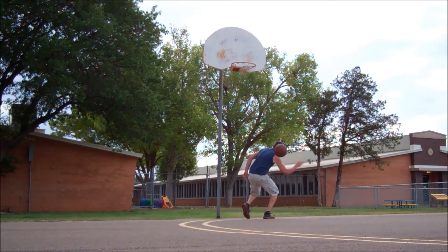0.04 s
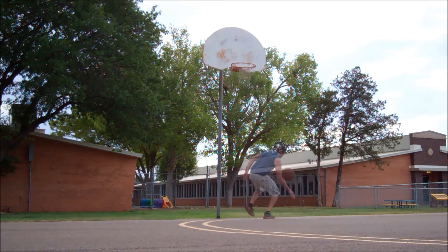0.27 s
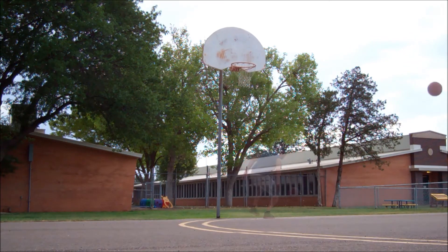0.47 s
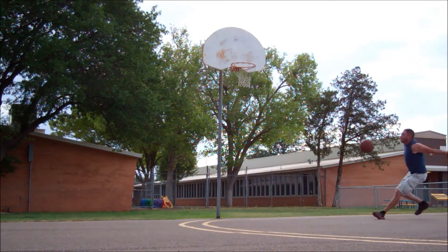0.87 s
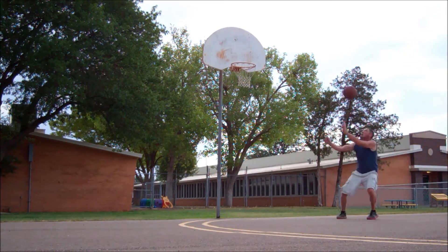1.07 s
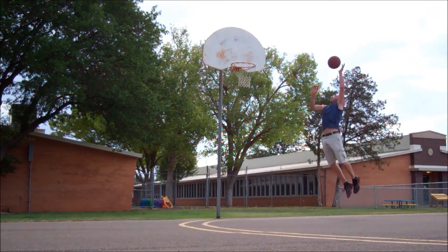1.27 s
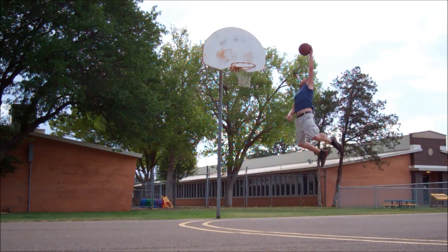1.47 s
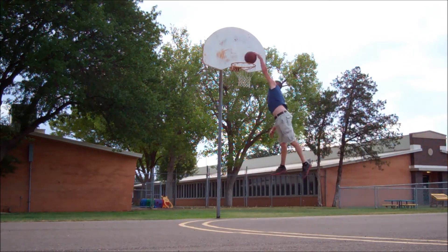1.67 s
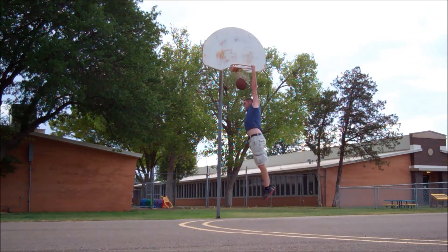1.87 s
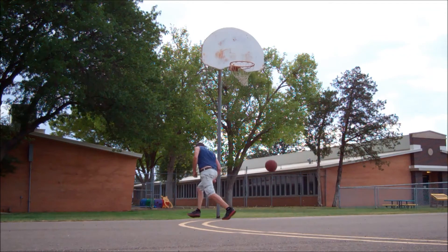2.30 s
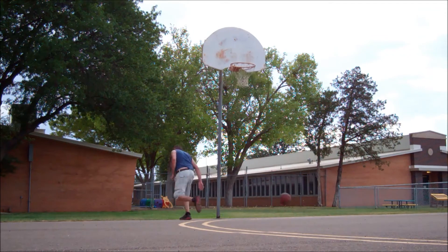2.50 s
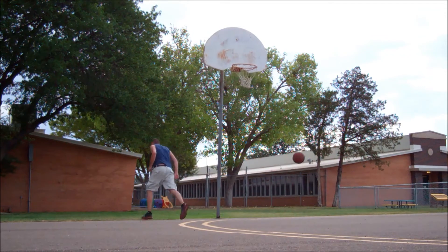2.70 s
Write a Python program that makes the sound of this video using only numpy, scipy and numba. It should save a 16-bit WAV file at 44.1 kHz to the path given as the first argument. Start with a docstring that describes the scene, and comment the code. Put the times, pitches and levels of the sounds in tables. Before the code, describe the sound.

A basketball bounces sharply twice on an outdoor court, with a thin echo. Between the bounces come gritty steps, a scuffing jump, a rattling dunk and a landing. Soft wind and a low hum fill the microphone throughout.

```python
"""Over a soft wind, a shoe scuffs and a basketball slaps the asphalt of an outdoor court, the air inside it
ringing. A player runs up over loose grit, scuffs into his jump and dunks: the steel rim rattles and hums,
and the backboard shudders. He lands and the ball bounces again. A low hum and a faint bird lie behind, and
walls and trees return a thin echo. The camera's gain control ducks at each bounce and slowly lets the
wind back in."""
import sys
import numpy as np
from scipy import signal
from scipy.fft import rfft, irfft, next_fast_len
from scipy.io import wavfile
from scipy.ndimage import uniform_filter1d, minimum_filter1d
from numba import njit

SR = 44100
rng = np.random.default_rng(int(sys.argv[2]) if len(sys.argv) > 2 else 0)


def generate_wav(sig):
    """Save sig (samples, or channels by samples) to the path in sys.argv[1] as 16-bit PCM at SR."""
    pcm = np.round(np.clip(np.atleast_2d(sig).T, -1, 1) * 32767).astype(np.int16)
    wavfile.write(sys.argv[1], SR, pcm)


N = 125685

# Wind common to both microphones, and the part that differs. Each row: frequency in Hz, gain in dB.
WIND_SPECTRUM = [(15, -61), (25, -16), (48, -9), (70, -4), (87, -4), (107, 0), (152, -5), (200, -4.5),
                 (322, -11.5), (457, -10), (493, -12.5), (813, -10), (1150, -13), (1280, -15),
                 (2640, -27.5), (3480, -28.5), (5890, -36.5), (7500, -40.5), (7880, -36.5), (8300, -39.5),
                 (9960, -44), (12900, -60), (21900, -120)]
WIND_SIDE_SPECTRUM = [(25, -12), (100, -9), (300, -7), (1000, 1.5), (3000, -5.5), (8000, -15.5),
                      (10000, -26), (14000, -44)]
# Strength of the wind. Each row: time in seconds, gain in dB.
GUSTS = [(.2, -0.5), (.45, 1.5), (.8, -1), (1.1, 2.5), (1.498, 0.5), (1.8, 0.5), (2.1, -.5), (2.5, -1.5),
         (2.85, 1)]
# A low hum and the camera's thin whine. Each row: frequency in Hz, rms level in dB.
HUM_TONES = [(102.3, -50), (132, -53.5), (7854, -74.5), (7881, -81)]
# Stereo balance of the wind and of the court. Each row: frequency in Hz, left minus right in dB.
WIND_BALANCE = [(30, 0), (120, 4), (1200, 4), (4000, 7.5), (8000, 8.5), (13000, -2.5)]
COURT_BALANCE = [(40, 0.5), (150, 4), (1200, 3.5), (2500, 4.5), (4500, 7), (8000, 16), (10500, 11.5),
                 (13000, -1)]
# Contour of the bird's whistle. Each row: time in seconds, pitch in Hz, level in dB.
WHISTLE = [(1.735, 3600, -60), (1.757, 4800, -61), (1.775, 3950, -54), (1.795, 3350, -57),
           (1.821, 2850, -55)]
# Single grains snapping. Each row: start in seconds, level in dB, tilt in dB per octave.
SNAPS = [(0.5154, -19, -2.5), (0.6752, -24.5, -3), (.8825, -21, 6), (0.9472, -20, 2), (1.3755, -22.5, -2),
         (1.9995, -30, -1), (2.2205, -26, -3), (2.4606, -28, -2)]
# Grit sprayed by a twisting sole. Each row: peak time in seconds, half length in seconds, level in dB.
SPRAYS = [(0.388, 0.0098, -49.5), (1.243, 0.016, -49), (2.48, 0.0099, -46)]
# Spectra of grit snapping, spraying and grinding, and of a sole's smack.
# Each row: frequency in Hz, gain in dB.
SNAP_SPECTRUM = [(300, -25), (1500, -2), (3500, 4.5), (7500, -7), (10000, -13.5), (14000, -28),
                 (21900, -80)]
SPRAY_SPECTRUM = [(500, -27), (2500, 6), (6000, -1), (9000, -2.5), (10500, -9.5), (12500, -15),
                  (14000, -32), (21900, -90)]
SCUFF_SPECTRUM = [(120, -47), (200, -22), (460, -0.5), (740, -2), (1030, -8.5), (1310, -1), (1820, -3.5),
                  (2440, 0.5), (3330, -2.5), (4260, -2), (6300, -12), (8740, -15), (9960, -25),
                  (12900, -54), (21900, -120)]
SOLE_SPECTRUM = [(47, -46), (80, -11), (229, -0.5), (380, -3.5), (520, -1.5), (700, -1.5), (900, -2),
                 (1220, 1), (1430, -4), (1830, -3), (2060, -8.5), (2600, -9), (4100, -12.5), (4350, -11.5),
                 (9960, -41), (12900, -58), (21900, -120)]
# Footfalls of running and landing.
# Each row: start in seconds, level in dB, 60 dB decay time (t60) in seconds, tilt in dB per octave.
STEPS = [(0.4581, -31, 0.019, 0.3), (0.9467, -28, 0.043, -4.5), (.980, -39, 0.019, 1),
         (1.3037, -37.5, .03, 6.5), (1.978, -36, 0.014, -0.5), (2.186, -32.5, 0.0055, 0),
         (2.427, -34.5, 0.025, -4), (2.6956, -32.5, 0.043, -4.5), (2.80, -37, 0.018, 3.5)]
LANDING = [(2.1493, -22, .018, 2), (2.153, -17, .02, -2), (2.156, -28, 0.07, -1),
           (2.162, -32.5, 0.043, 1.5), (2.1703, -25.5, 0.025, 0.5)]
# Sliding soles. Each row: peak time, rise and fall in seconds, level in dB, tilt in dB per octave.
SCUFFS = [(.485, 0.036, .025, -53, -1.5), (.575, 0.01, 0.013, -48, -2.5), (.628, 0.005, .006, -50.5, 3),
          (.925, 0.027, 0.024, -50, 4), (1.003, 0.0046, 0.0083, -32, 1), (1.018, 0.015, 0.019, -30, -1),
          (1.04, 0.0082, 0.011, -35.5, 1), (1.119, 0.012, .0115, -23, 1), (1.235, 0.051, 0.025, -42.5, 1.5),
          (1.34, 0.097, 0.079, -49, -1), (1.953, 0.0077, 0.017, -43, -3.5), (2.205, 0.018, 0.042, -44, -5),
          (2.445, 0.034, 0.026, -45.5, -3), (2.479, .005, 0.014, -43.5, -0.5),
          (2.508, 0.0088, 0.014, -49.5, 0.5), (2.667, 0.0098, 0.013, -48, 2.5)]
# Blows on the rim. Each row: start in seconds, rattle level in dB, rattle t60 in seconds,
# rattle tilt in dB per octave, ring level in dB.
RIM_BLOWS = [(1.8289, -25.5, 0.062, .7, -43), (1.8349, -29, 0.12, 0.4, -39), (1.841, -29.5, 0.1, .8, -45),
             (1.854, -25.5, 0.046, -0.5, -33), (1.8601, -17, 0.022, .3, -32.5),
             (1.868, -28.5, 0.048, .5, -45), (1.8816, -28.5, 0.038, 2, -43.5)]
# The rim rocking on its mount. Each row: start in seconds, frequency in Hz, level in dB, t60 in seconds.
RIM_KNOCKS = [(1.831, 245, -24, .07), (1.8333, 126, -18, 0.063), (1.856, 310, -28, .05),
              (1.878, 302, -25, 0.037), (1.888, 450, -26.5, .05), (1.916, 474, -31, .07)]
# Modes of rim and backboard, and of the clink as the hoop is let go.
# Each row: frequency in Hz, level in dB, t60 in seconds.
RIM_MODES = [(117.4, -9, 0.08), (136.7, -8, 0.76), (202, -10, .15), (231.6, -4, 0.33), (274.5, -10.5, 0.38),
             (332.8, -6, 0.5), (397, -6, 0.25), (446, -8, .32), (505.2, -14, 0.35), (702, -11, 0.24),
             (954, -3.5, 0.088), (1106, -10, 0.11), (2253, -8, 0.12), (2850, -12, 0.12)]
CLINK_MODES = [(2050, -12, 0.18), (2220, -5, 0.18), (2510, -6.5, 0.2), (2720, -9, 0.13), (3260, -4.5, .14),
               (3420, -9, .1), (3600, -2, 0.07), (4620, -9, 0.12)]
# Spectra of the rattling rim and shuddering backboard and pole. Each row: frequency in Hz, gain in dB.
RATTLE_SPECTRUM = [(47, -34), (80, 4), (127, -1), (179, -5.5), (335, 1), (799, -12.5), (958, 0.5),
                   (1410, -20), (2100, -14), (2850, -10.5), (4350, -24), (4910, -18), (5890, -17.5),
                   (7070, -30.5), (8650, -21.5), (9960, -38), (12900, -43), (21900, -120)]
SHUDDER_SPECTRUM = [(25, -47), (70, -19), (110, -10), (170, -5), (250, -1), (400, -0.5), (520, -7),
                    (700, -20), (2000, -47), (12000, -90)]
# Bounces of the ball. Each row: start in seconds, slap level in dB, slap width in ms, delay and width of
# its return in ms, return relative to the slap in dB, then levels in dB of the thump, the ring while
# squashed, the ring at lift-off and the grit.
BOUNCES = [(0.8209, 10, 0.038, 0.73, .043, -0.5, -6, -12, -3.5, -11),
           (2.5779, 7.5, 0.047, 0.632, .085, -5, -9.5, -16, -15, -17)]
# Tone of the ball's slap. Each row: frequency in Hz, gain in dB.
SLAP_SPECTRUM = [(500, -2.5), (800, 2), (1150, 4), (2000, -1.5), (2700, 3), (3400, 0), (4100, -5),
                 (5400, -0.5), (7200, -4), (8700, 1), (11000, 3), (15000, -3)]
# Modes of the squashed shell and the air inside. Each row: frequency in Hz, level in dB, t60 in seconds.
SHELL_MODES = [(100, 0, .05), (255, -10, .03), (620, -9, .018)]
CAVITY_MODES = [(640, -15, 0.031), (847, -6.5, 0.029), (962, 0, 0.03), (990, -23, 0.12),
                (1210, -6.5, 0.029), (1360, -20, 0.041), (1666, -13, 0.051), (2100, -23, 0.055),
                (2227, -33, 0.16), (2770, -33, 0.14), (3270, -39, 0.16)]


def undb(db):
    """Amplitude ratio of a level in decibels."""
    return 10 ** (np.asarray(db) / 20)


def clock(length=N):
    """Sample times in seconds."""
    return np.arange(length) / SR


def unit(x):
    """Normalisation to an rms of 1."""
    return x / np.sqrt(np.mean(x ** 2))


def at(x, start):
    """A delay that places a sound on the time line, at start seconds."""
    return np.pad(x, (int(round(start * SR)), N))[:N]


def colour(x, points, tilt_db=0):
    """Minimum-phase filter through (Hz, dB) points, tilted by tilt_db per octave."""
    size = next_fast_len(len(x) // 2 + 2048) * 2
    octave = np.log2(np.maximum(np.fft.rfftfreq(size, 1 / SR), 1))
    hz, db = np.array(points, float).T
    gain_db = np.interp(octave, np.log2(hz), db + tilt_db * np.log2(hz / hz[0]))
    cepstrum = irfft(np.log(undb(gain_db)))
    cepstrum[1:size // 2] *= 2  # folding onto positive time makes the filter causal
    cepstrum[size // 2 + 1:] = 0
    return irfft(rfft(x, size) * np.exp(rfft(cepstrum)))[:len(x)]


def cut(x, hz, kind, order=2):
    """Maximally flat low-pass or high-pass filter."""
    return signal.sosfilt(signal.butter(order, hz, kind, fs=SR, output="sos"), x)


def noise(points, tilt_db=0, rough=0):
    """Short coloured noise of rms 1; log-normal roughness breaks it into grains."""
    white, graininess = rng.standard_normal((2, N // 8))
    return unit(colour(white * np.exp(rough * graininess), points, tilt_db))


def drift(rate_hz):
    """Random modulation of rms 1, gliding linearly between values drawn at rate_hz."""
    hold = int(SR / rate_hz)
    steps = np.repeat(rng.standard_normal(N // hold + 1), hold)
    return unit(uniform_filter1d(steps, hold)[:N])


def fade(t60, length=N // 8):
    """Exponential damping, 60 dB in t60 seconds."""
    return np.exp(-np.log(1000) * clock(length) / t60)


def ring(modes, scatter=0, attack_s=0.00014):
    """Free vibration as a sum of damped modes; scatter randomises their phases."""
    t = clock(N // 2)
    tones = sum(undb(db) * fade(t60, len(t)) * np.sin(2 * np.pi * (hz * t + scatter * rng.random()))
                for hz, db, t60 in modes)
    return tones * (1 - np.exp(-(t / attack_s) ** 2))


def spread(x, balance):
    """A frequency-dependent level difference between the left and right microphones."""
    return np.array([colour(x, [(hz, side * db / 2) for hz, db in balance]) for side in (1, -1)])


def hum():
    """Slight frequency modulation makes the steady tones of hum and whine waver."""
    out = 0
    for hz, db in HUM_TONES:
        pitch = hz + 0.76 * drift(11.7)
        out += np.sqrt(2) * undb(db) * np.sin(2 * np.pi * np.cumsum(pitch) / SR)
    return out


def wind():
    """Turbulence gives broadband noise that swells in gusts; a part in antiphase widens it."""
    mid = undb(-41.5) * unit(colour(rng.standard_normal(N), WIND_SPECTRUM))
    side = undb(-54) * unit(colour(rng.standard_normal(N), WIND_SIDE_SPECTRUM))
    flicker_db = 0.82 * drift(14)
    gust = undb(np.interp(clock(), *np.array(GUSTS).T) + flicker_db)
    return spread(gust * mid, WIND_BALANCE) + gust * np.array([side, -side])


def yard_echo(x, t60=0.24):
    """Diffuse reflection from walls and trees: convolution with a dull, decaying noise on each side."""
    tails = [cut(rng.standard_normal(N // 8), 4100, "low") * fade(t60) for _ in range(2)]
    return undb(-26.5) * np.array([signal.fftconvolve(x, h / np.linalg.norm(h))[:N] for h in tails])


def bird():
    """One distant whistle flicks up and falls, fluttering by frequency and amplitude modulation."""
    times, hz, db = np.array(WHISTLE).T
    pitch = np.interp(clock(), times, hz) * (1 + 0.067 * drift(600))
    level = uniform_filter1d(np.interp(clock(), times, undb(db), left=0, right=0), size=300)
    flutter = undb(5 * drift(140))
    return level * flutter * np.sin(2 * np.pi * np.cumsum(pitch) / SR)


def gravel():
    """A grain cracking under a sole is an impulse; many spraying away merge into a bright crackle."""
    t, out = clock(N // 8), 0
    for start, db, tilt in SNAPS:
        impulse = t == 0
        tail = undb(-17) * rng.standard_normal(len(t)) * fade(0.0081)
        crack = colour(impulse + tail, SNAP_SPECTRUM, tilt)
        out += at(undb(db) * crack / np.linalg.norm(crack), start)
    middle = t.mean()
    for peak, half_length, db in SPRAYS:
        swell = np.exp(-((t - middle) / half_length) ** 2)
        out += at(undb(db) * noise(SPRAY_SPECTRUM, rough=0.96) * swell, peak - middle)
    return out


def footfalls():
    """Impact of a sole on asphalt gives a damped burst of noise and crunches the loose grit."""
    out = 0
    for start, db, t60, tilt in LANDING + STEPS:
        crunch = undb(-16) * noise(SCUFF_SPECTRUM, tilt_db=1, rough=0.98) * fade(0.028)
        smack = noise(SOLE_SPECTRUM, tilt) * fade(t60)
        out += at(undb(db) * (smack + crunch), start)
    return out


def scuffs():
    """Sliding friction of a sole over grit gives a grainy noise that swells and dies away."""
    t, out = clock(N // 8), 0
    middle = t.mean()
    for peak, rise, fall, db, tilt in SCUFFS:
        width = np.where(t < middle, rise, fall)
        swell = np.exp(-np.abs((t - middle) / width) ** 1.41)
        out += at(undb(db) * noise(SCUFF_SPECTRUM, tilt, rough=0.98) * swell, peak - middle)
    return out


def hoop(shudder_start_s=1.831, clink_start_s=2.0265):
    """Impacts of ball and hand excite the rim's modes: it chatters, shakes the backboard, clinks once."""
    out = 0
    for mode in CLINK_MODES:
        clink = undb(-37.5) * ring([mode], scatter=1, attack_s=0.00077)
        out += at(clink, clink_start_s) * (1 + 0.45 * drift(300))
    steel = ring(RIM_MODES)
    for start, rattle_db, t60, tilt, ring_db in RIM_BLOWS:
        rattle = noise(RATTLE_SPECTRUM, tilt, rough=0.41) * fade(t60)
        out += at(undb(rattle_db) * rattle, start)
        out += at(undb(ring_db) * steel, start) * (1 + 0.41 * drift(90))
    for start, hz, db, t60 in RIM_KNOCKS:
        out += at(ring([(hz, db, t60)], attack_s=0.0042), start)
    shudder = undb(-31.5) * noise(SHUDDER_SPECTRUM) * fade(0.3)
    return out + at(shudder, shudder_start_s)


def ball(squash_delay_s=0.003, contact_s=0.0118):
    """Impact radiates a slap and a thump; the air cavity resonates, muffled in contact, then freely."""
    out = 0
    for (start, slap_db, width_ms, return_ms, return_width_ms, return_db,
         thump_db, squash_db, lift_db, grit_db) in BOUNCES:
        age_ms = (clock() - start) * 1000
        pulse = np.exp(-0.5 * (age_ms / width_ms) ** 2)
        returned = undb(return_db) * np.exp(-0.5 * ((age_ms - return_ms) / return_width_ms) ** 2)
        slap = undb(slap_db) * cut(colour(pulse + returned, SLAP_SPECTRUM), 450, "high", order=1)
        grit = undb(grit_db) * noise(SCUFF_SPECTRUM, tilt_db=3) * (fade(0.0056) + undb(-14) * fade(0.06))
        thump = -undb(thump_db) * ring(SHELL_MODES, attack_s=0.0012)
        muffled = undb(squash_db) * ring(CAVITY_MODES, attack_s=0.004)
        free = undb(lift_db) * ring(CAVITY_MODES, attack_s=0.0009)
        # lift-off drives the air with the opposite sign
        ringing = at(muffled, start + squash_delay_s) - at(free, start + contact_s)
        out += slap + at(thump, start) + at(grit, start) + ringing * (1 + 0.25 * drift(500))
    return out


def scene():
    """Superposition of the court's direct sound, its echo, the wind and the hum."""
    court = ball() + hoop() + footfalls() + scuffs() + gravel() + bird()
    return spread(court, COURT_BALANCE) + yard_echo(court) + wind() + spread(hum(), WIND_BALANCE)


@njit
def hold_peaks(x, retention):
    """An envelope follower with instant attack and exponential release."""
    out, held = np.empty(len(x)), 0.
    for i in range(len(x)):
        held = max(x[i], held * retention)
        out[i] = held
    return out


def record(dry, threshold_db=-14, duck_db_per_db=0.72, release_s=0.46, onset_s=0.2012):
    """Compression and band limiting: the sound begins at about 0.2 s; the camera ducks on peaks and recovers
    slowly."""
    peak = -minimum_filter1d(-np.abs(dry).max(axis=0), size=64)  # running maximum
    excess_db = np.maximum(20 * np.log10(peak + 1e-9) - threshold_db, 0)
    duck_db = hold_peaks(excess_db * duck_db_per_db, np.exp(-1 / (release_s * SR)))
    fade_in = np.clip((clock() - onset_s) / 0.0023, 0, 1)
    ducked = cut(dry, 38, "high", order=1) * undb(-duck_db) * fade_in
    treble_cut = signal.ellip(8, 0.2, 70, 14500, fs=SR, output="sos")
    return signal.sosfilt(treble_cut, ducked)


dry = scene()
out = record(dry)
generate_wav(out)
```